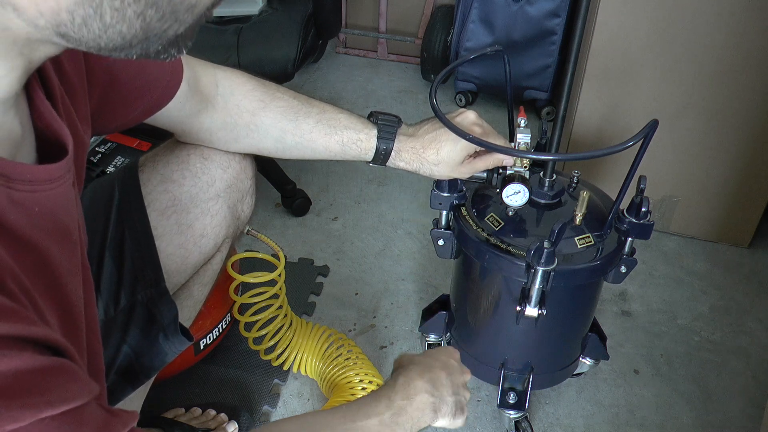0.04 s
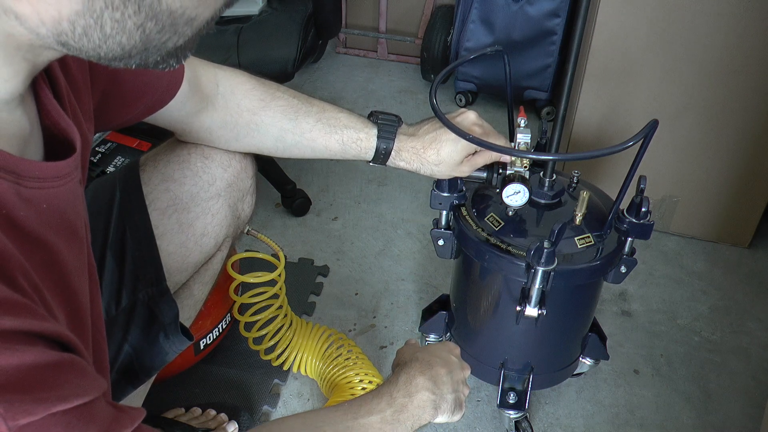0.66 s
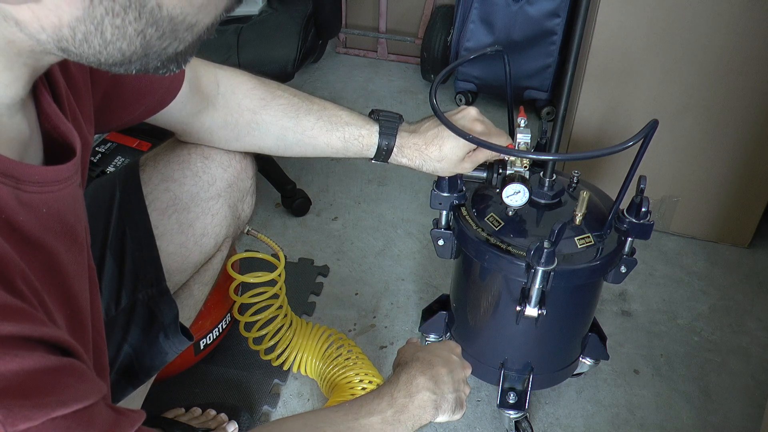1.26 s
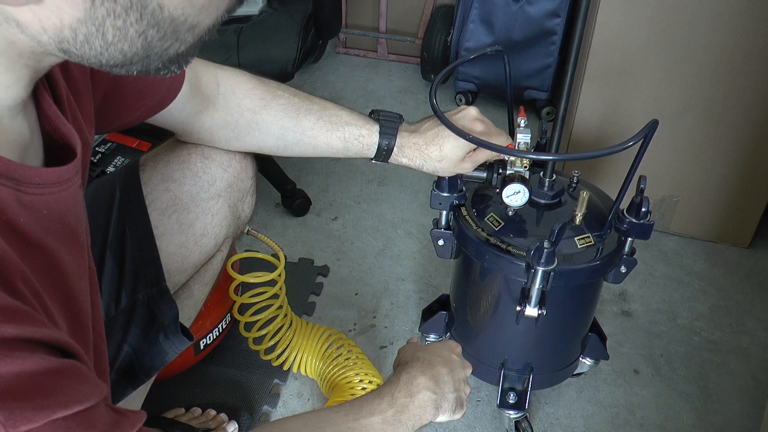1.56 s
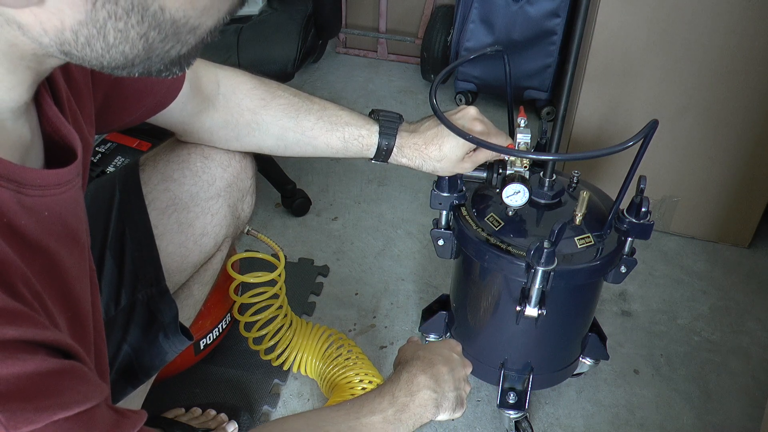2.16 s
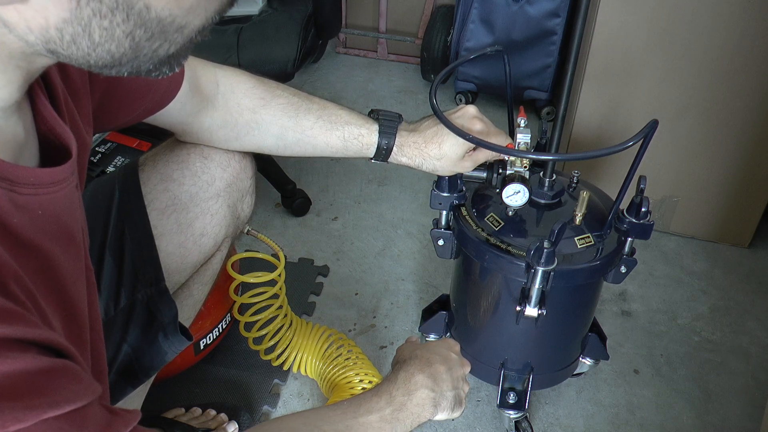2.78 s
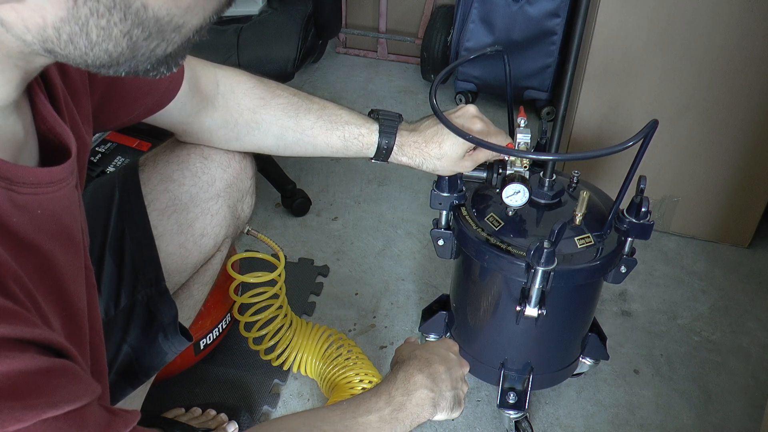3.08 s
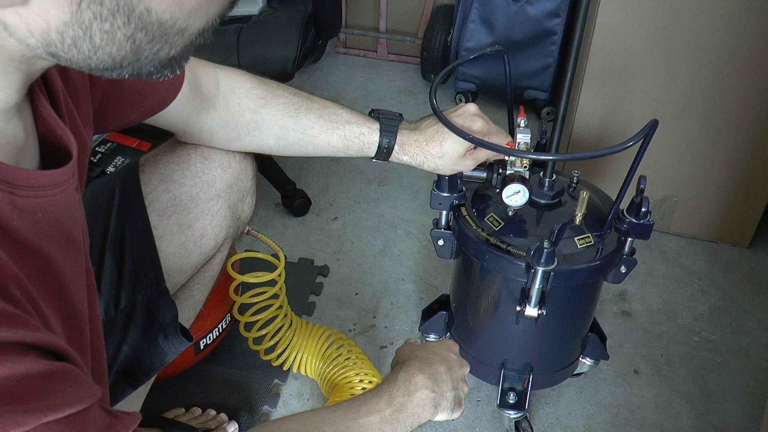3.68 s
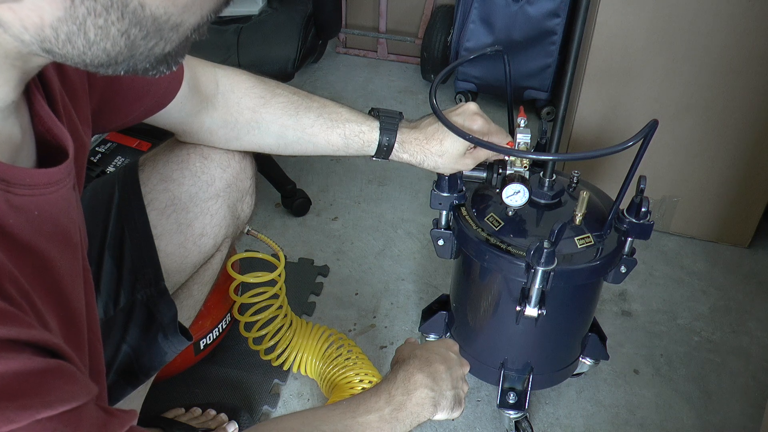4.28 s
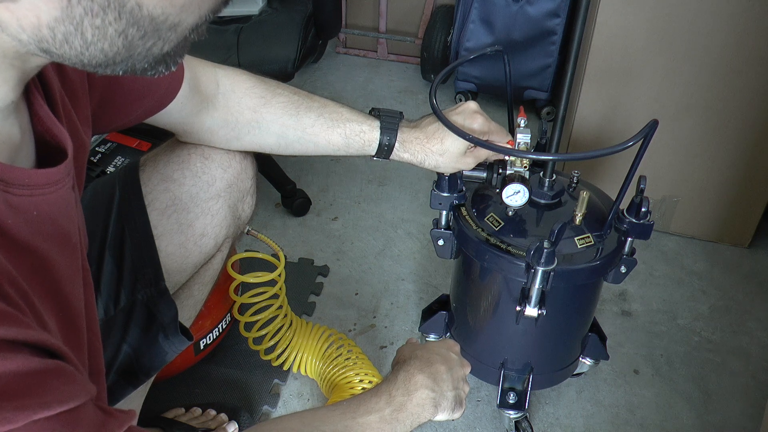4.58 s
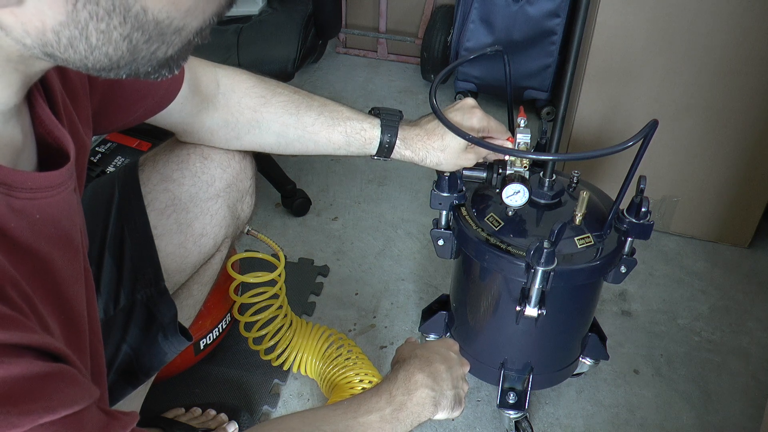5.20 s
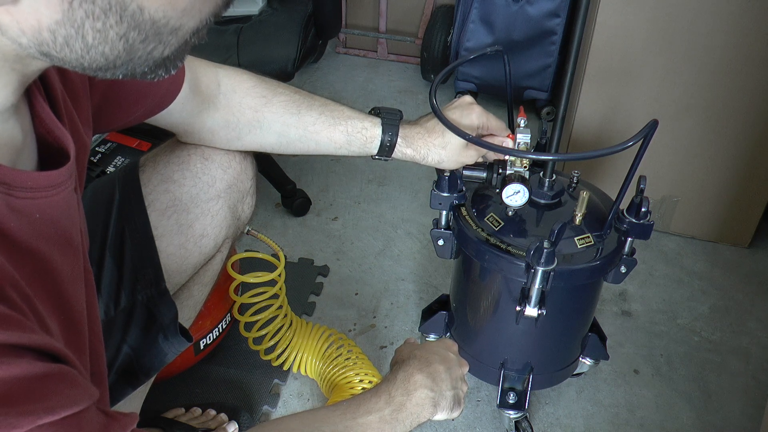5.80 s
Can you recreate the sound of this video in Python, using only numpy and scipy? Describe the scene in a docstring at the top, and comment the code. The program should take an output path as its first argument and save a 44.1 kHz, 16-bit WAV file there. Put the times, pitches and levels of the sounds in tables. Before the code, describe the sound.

A continuous, sharp hiss of air escapes from a metal pressure tank, heard close by in a workshop with short reflections. A high whistle and a lower hollow tone colour the rush. The valve opens a little further, giving a small surge and a slightly louder hiss. As the flow finally gives way, the hiss swells a little, the whistle falls and the brightness drains off. The room hums very faintly.

```python
"""Air rushing from a pressure pot

Compressed air roars out of the open valves of a steel pot on a workshop floor. The fittings colour the
hiss, which has a whistling edge. The valve opens a little wider; near the end the flow gives way, so
the whistle slides down and the treble dulls. Floor and walls add quick echoes; the room hums faintly."""
import sys
import numpy as np
from scipy import signal
from scipy.fft import rfft, irfft, next_fast_len
from scipy.io import wavfile
from scipy.ndimage import map_coordinates

SR = 44100
rng = np.random.default_rng(int(sys.argv[2]) if len(sys.argv) > 2 else 0)


def generate_wav(signal):
    """Clip the signal to [-1, 1] and save it as 16-bit WAV at the path in sys.argv[1]."""
    frames = np.transpose(np.atleast_2d(signal))
    scaled = np.clip(frames, -1, 1) * 32767
    pcm = np.round(scaled).astype(np.int16)
    wavfile.write(sys.argv[1], SR, pcm)


N = 266716

# tone of the workshop's rumble: f/Hz, relative level/dB
ROOM_RUMBLE = [(15, -15), (30, -3), (70, -0.5), (125, -1), (190, -3.5), (300, -6.5), (800, -50),
               (3000, -62)]
# strength of the close echoes against the direct sound: f/Hz, level/dB
ECHO_LEVELS = [(500, -17), (2400, -13), (3800, -7.5), (11500, -8), (14000, -16)]
# the part that differs between left and right, against the part they share: f/Hz, level/dB
STEREO_WIDTH = [(250, -6), (700, -10), (1290, -13), (2380, -24.5), (4400, -14.5), (6500, -24),
                (8120, -15.5), (12000, -26)]
# left microphone against right: f/Hz, level/dB
BALANCE = [(380, -3), (700, -1.5), (1290, -0.5), (4400, 0), (8120, -0.5), (15000, 0)]
# tone of the jet's swirling air: f/Hz, relative level/dB
JET_TONE = [(300.0, -88), (520.0, -83.5), (800.0, -81.5), (1200.0, -76.5), (1550.0, -79.5), (1900.0, -75),
            (3200.0, -79.5), (4000.0, -76), (6000.0, -62.5), (9000.0, -69.5), (11500.0, -76.5),
            (13300.0, -84.5), (16300.0, -80)]
# broad resonances and dips of valve and fittings, the outlet's own first: f/Hz, width/Hz, level/dB
FITTING_PEAKS = [(2416, 190.5, 18), (4712, 360, 10), (5290, 233, -5), (5660, 93, 2.5), (6810, 240, 3.5),
                 (7270, 180, -1.5), (8310, 267, 6.5), (9890, 204, 9.5), (10430, 375, -7), (11394, 216, 7.5),
                 (12300, 340, 7)]
# narrow resonances and dips of the pot and the space around it: f/Hz, width/Hz, level/dB
POT_PEAKS = [(520, 18, 3), (684, 9, 5), (940, 13, 2.5), (1039, 12, 4), (1210, 16, 3.5), (1290, 16, -5),
             (1525, 18, -3), (2110, 11, 4.5), (2347, 11, 3.5), (2590, 12, -7), (2896, 16, 6), (4421, 10, 5),
             (4786, 10, 4), (4969, 11, 6), (5690, 10, 4), (5857, 13, 5), (6132, 14, 5), (6223, 11, 4.5),
             (6390, 10, 4), (6666, 14, 4), (6874, 12, 4.5), (6988, 10, 5), (7397, 10, 7), (8010, 10, 5),
             (8446, 12, 7), (8675, 14, -9), (8769, 10, 6), (10002, 14, 6), (11693, 12, 7.5)]
# humps and dips that glide with the whistle: centre and width (times its pitch), level/dB
WHISTLE_PEAKS = [(0.71, 0.07, 2), (0.87, 0.028, -5), (0.99, 0.1, 6), (1.2, 0.039, -5), (1.47, 0.16, 6.5),
                 (1.9, .1, 1)]


def amp(db):
    """Turn decibels into a number to multiply by."""
    return 10 ** (np.asarray(db) / 20)


def unit(x):
    """Scale a sound to an average power of 1."""
    return x / np.sqrt(np.mean(x ** 2) + 1e-20)


def along(points, hz):
    """Read between a table's rows, on a scale of octaves."""
    freqs, levels = np.transpose(points)
    return np.interp(np.log(hz + 1), np.log(freqs), levels)


def bell(x, centre, width):
    """A smooth hump of height 1."""
    return np.exp(-.5 * ((x - centre) / width) ** 2)


def humps(rows, hz):
    """Add up a table's peaks and dips, in dB."""
    return sum(db * bell(hz, centre, width) for centre, width, db in rows)


def switch(x, at, width):
    """A smooth step from 0 to 1."""
    return .5 + .5 * np.tanh((x - at) / (2 * width))


def wobble(t, rate):
    """A smooth curve through `rate` random points a second."""
    return map_coordinates(rng.standard_normal(int(t[-1] * rate) + 4), [t * rate])


def filtered(x, response):
    """Turn each frequency up or down by response(hz)."""
    size = next_fast_len(N + SR // 2)
    return irfft(rfft(x, size) * response(np.fft.rfftfreq(size, 1 / SR)), size)[..., :N]


def background(rumble_db=-72, side_db=-1, hum_hz=140):
    """Faint room rumble and a wavering low hum that swells and fades."""
    t = np.arange(N) / SR
    mid, side = unit(filtered(rng.standard_normal((2, N)), lambda hz: amp(along(ROOM_RUMBLE, hz))))
    side = side * amp(side_db)
    hum_db = -82 + 8 * bell(t, centre=3.6, width=1.5)
    hum = unit(np.sin(2 * np.pi * hum_hz * t + 0.87 * wobble(t, 6)))
    return amp(rumble_db) * np.array([mid + side, mid - side]) + amp(hum_db) * hum


def reflections(x, first_s=0.0037, fade_s=0.13):
    """Sound bounces off floor, pot and walls in a dense burst of echoes."""
    t = np.arange(SR // 4) / SR
    tail = rng.standard_normal(len(t)) * amp(-60 * t / fade_s) * (t > first_s)
    return signal.fftconvolve(x, tail / np.linalg.norm(tail))[:N]


def workshop(x):
    """Left and right share the sound and most echoes (mid); a small part differs (side)."""
    echo = lambda hz: amp(along(ECHO_LEVELS, hz))
    echoing = x + filtered(reflections(x), echo)
    mid = filtered(echoing, lambda hz: 1 / np.hypot(1, echo(hz)))  # take back the added loudness
    side = filtered(reflections(x), lambda hz: amp(along(STEREO_WIDTH, hz)))
    return np.array([mid + side, mid - side])


def fittings(air, low_hz=250, trim_db=-0.72):
    """Jet, fittings and pot give the hiss its steady tone; so small an opening gives off no bass."""
    colour_db = lambda hz: along(JET_TONE, hz) + humps(FITTING_PEAKS, hz) + humps(POT_PEAKS, hz)
    return filtered(air, lambda hz: amp(trim_db + colour_db(hz)) * hz ** 2 / (hz ** 2 + low_hz ** 2))


def valve(t, hz, open_s=1.76, turn_s=0.032, surge_s=0.12, fizz_hz=10700):
    """A hand opens the valve wider: a short surge, then a louder, fizzier hiss. Gives dB."""
    opened = switch(t, open_s, turn_s)
    narrow_db = -1.03 - 3 * switch(hz, fizz_hz, 300)
    surge_db = 2.3 * np.exp(-np.maximum(t - open_s, 0) / surge_s)
    return narrow_db * (1 - opened) + surge_db * opened


def hollow_note(t, hz, pitch_hz=935, end_s=5.08, body_hz=760):
    """A hollow note fades as the flow weakens, and the low roar thins with it. Gives dB."""
    weak = switch(t, end_s, 0.1)
    note_db = 13.5 - 11 * weak - 0.5 * wobble(t, 8.3)
    body_db = -3.5 * weak * (1 - switch(hz, body_hz, 50))
    return note_db * bell(hz, pitch_hz, width=41) + body_db


def whistle(t, hz, giving_way, start_hz=8280, slide_hz=1320, drift=0.002):
    """The jet's whistle wavers a little and slides down as the flow gives way. Gives dB."""
    pitch_hz = (start_hz - slide_hz * giving_way) * (1 + drift * wobble(t, 7.2))
    return humps(WHISTLE_PEAKS, hz / pitch_hz)


def jet(spent_s=6.04, give_s=0.47, dull_s=0.16, flutter_db=0.24, bright_hz=16000):
    """Swirling air makes a hiss whose loudness and tone change as the pot drains."""
    hz, t, noise = signal.stft(rng.standard_normal(N), SR, nperseg=1024)
    hz = hz[:, None]
    # the hiss sinks slowly, then swells as the flow gives way ever faster
    giving_way = np.exp((t - spent_s) / give_s)
    level_db = 1 - 0.118 * t + 3 * giving_way
    notes_db = whistle(t, hz, giving_way) + hollow_note(t, hz)
    outlet_hz, outlet_width, _ = FITTING_PEAKS[0]
    outlet_db = (3 - 0.86 * t) * bell(hz, outlet_hz, outlet_width)
    dull_db = -21.5 * np.exp((t - spent_s) / dull_s)  # the treble drains away at the very last
    # a faster jet sheds finer swirls, so flutter shows most in the treble
    treble_db = (dull_db + 2 * flutter_db * wobble(t, 30)) * (hz / bright_hz) ** 2
    level_db += flutter_db * wobble(t, 25)
    gain = amp(level_db + valve(t, hz) + notes_db + outlet_db + treble_db)
    _, air = signal.istft(noise * gain, SR, nperseg=1024)
    return air[:N] * np.sqrt(SR / 2)


def scene():
    """The hissing pot in its room."""
    return workshop(fittings(jet())) + background()


def record(dry, top_hz=16550):
    """The two microphones differ slightly in tone; nothing above top_hz is kept."""
    balance = lambda hz: amp(np.outer([.5, -.5], along(BALANCE, hz)))
    return filtered(dry, lambda hz: balance(hz) * (hz < top_hz))


dry = scene()
out = record(dry)
generate_wav(out)
```